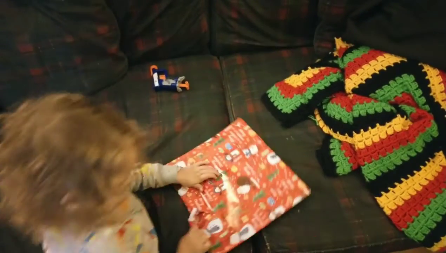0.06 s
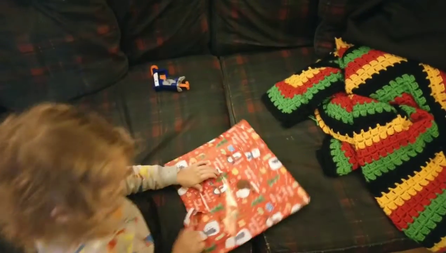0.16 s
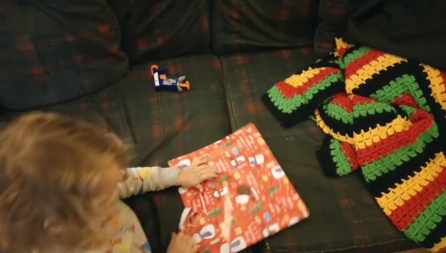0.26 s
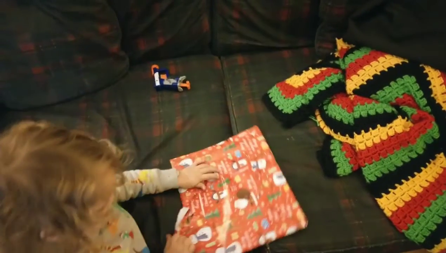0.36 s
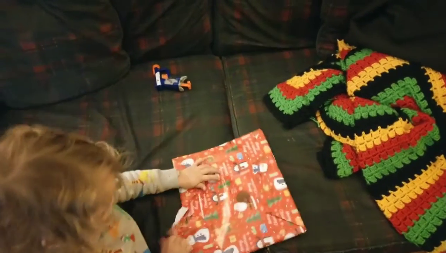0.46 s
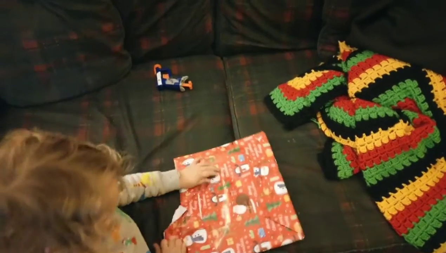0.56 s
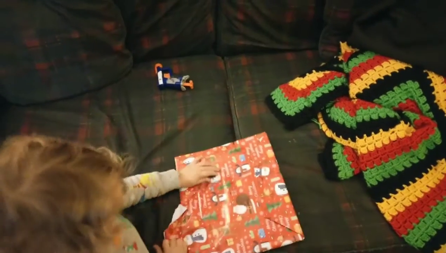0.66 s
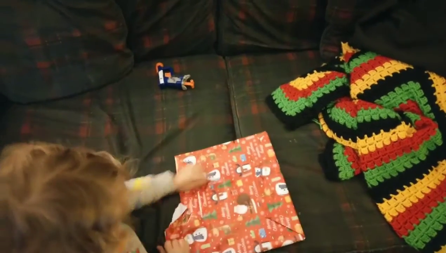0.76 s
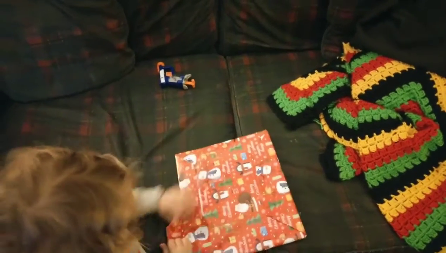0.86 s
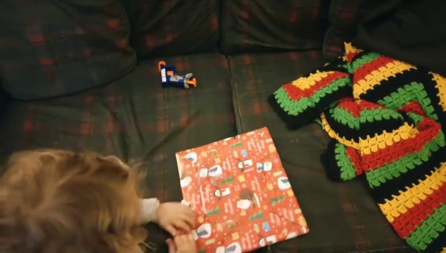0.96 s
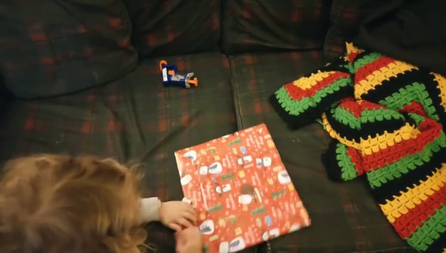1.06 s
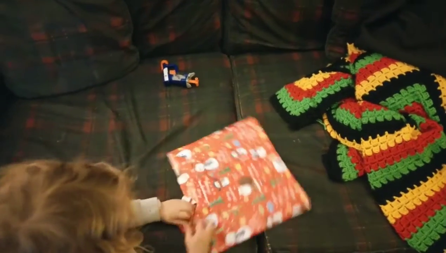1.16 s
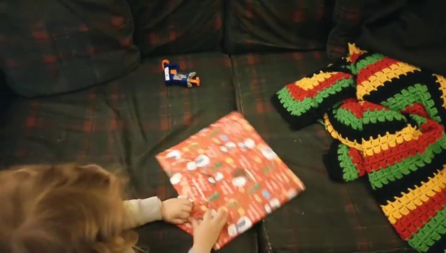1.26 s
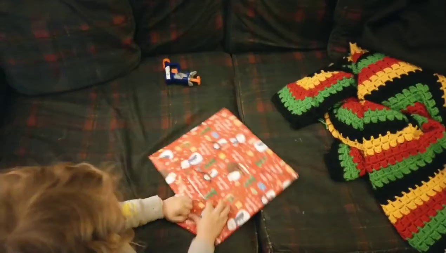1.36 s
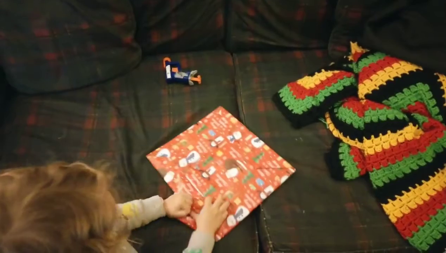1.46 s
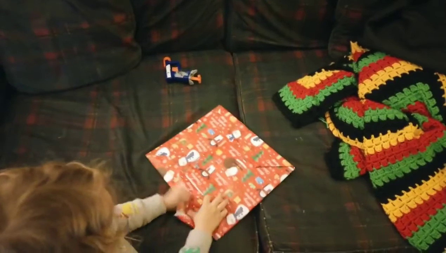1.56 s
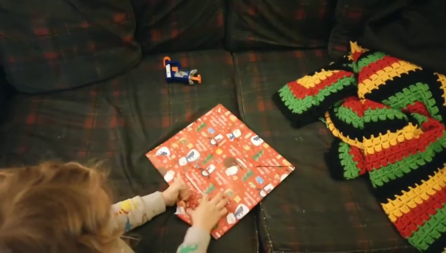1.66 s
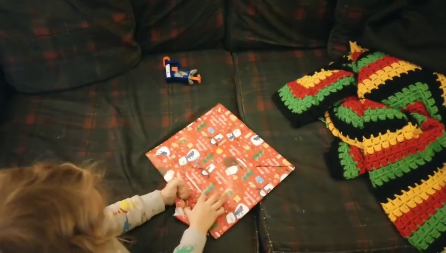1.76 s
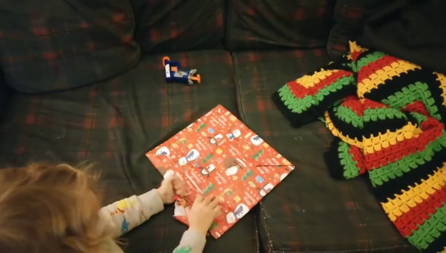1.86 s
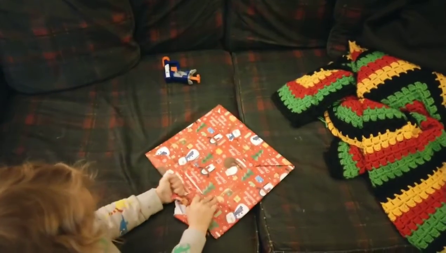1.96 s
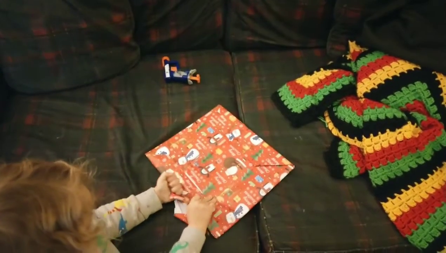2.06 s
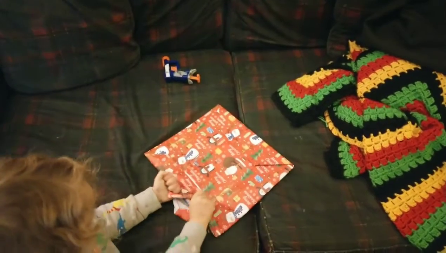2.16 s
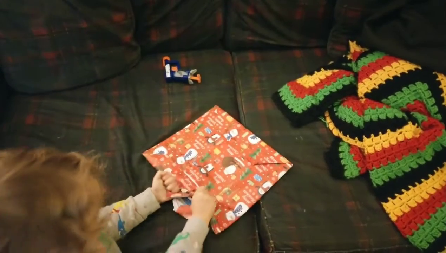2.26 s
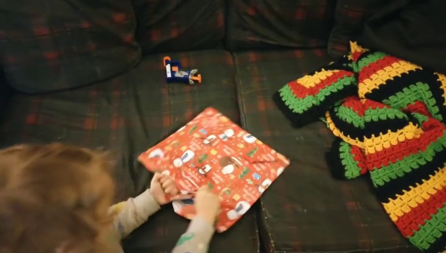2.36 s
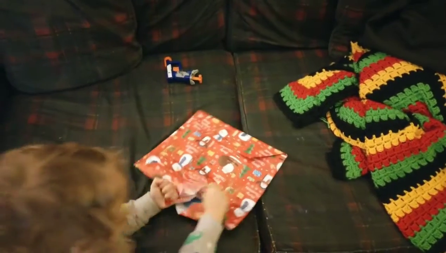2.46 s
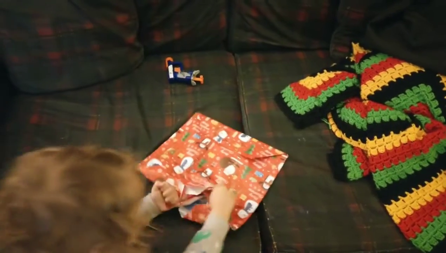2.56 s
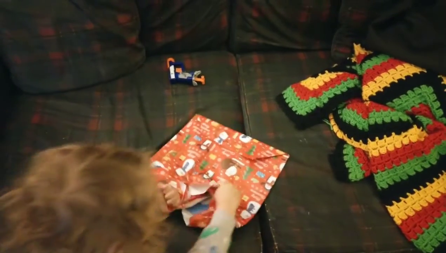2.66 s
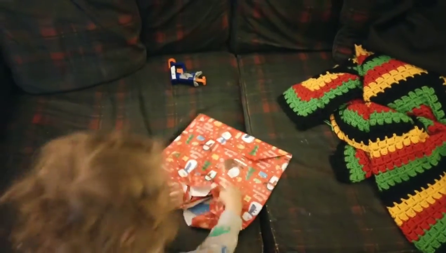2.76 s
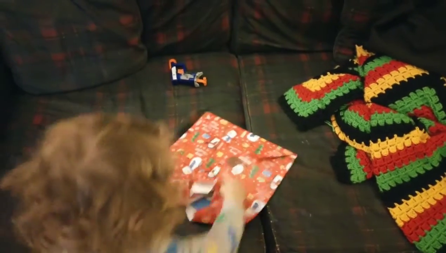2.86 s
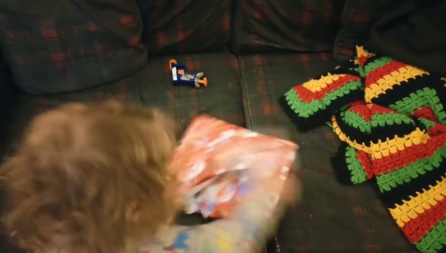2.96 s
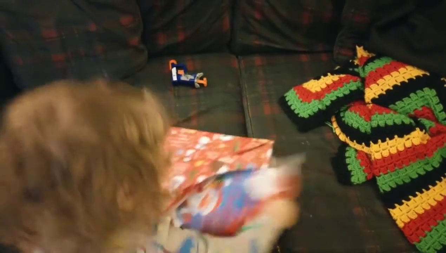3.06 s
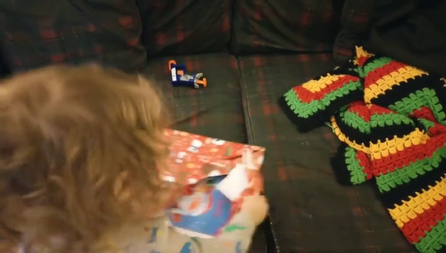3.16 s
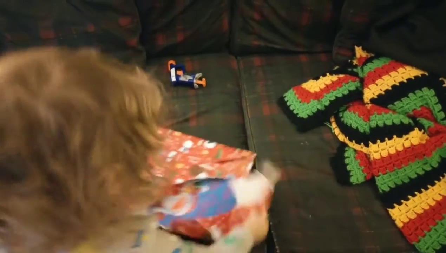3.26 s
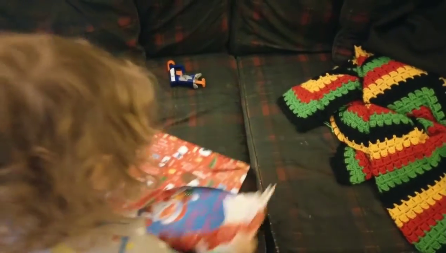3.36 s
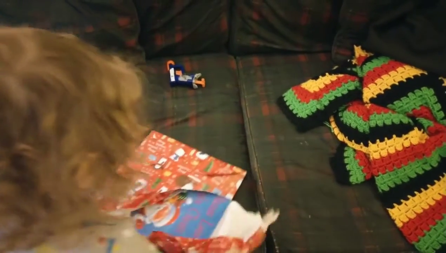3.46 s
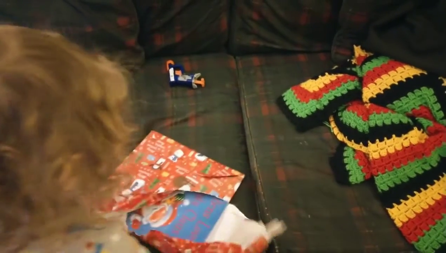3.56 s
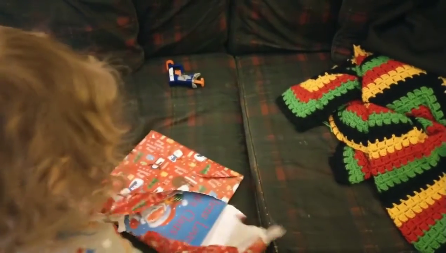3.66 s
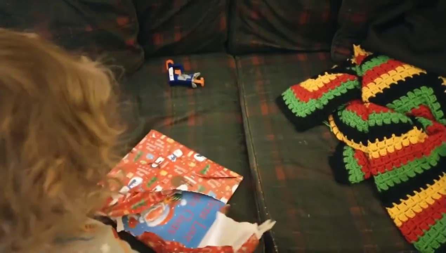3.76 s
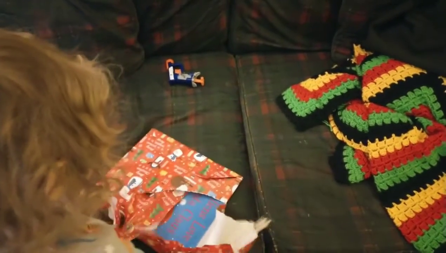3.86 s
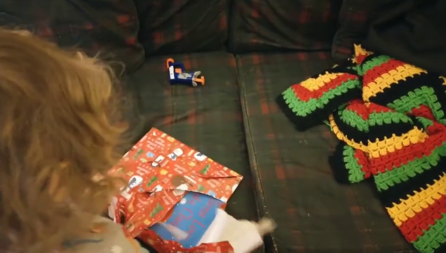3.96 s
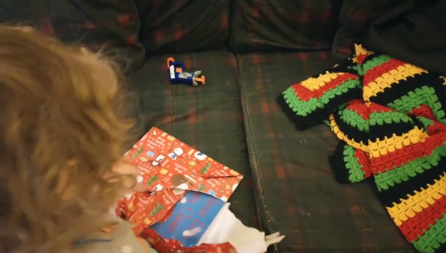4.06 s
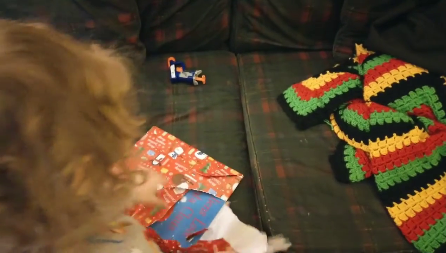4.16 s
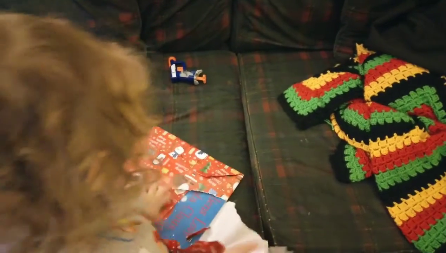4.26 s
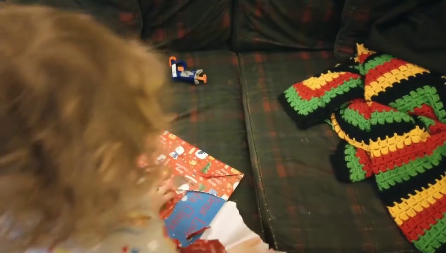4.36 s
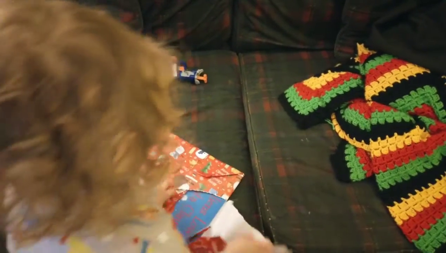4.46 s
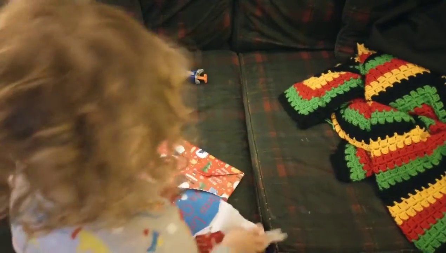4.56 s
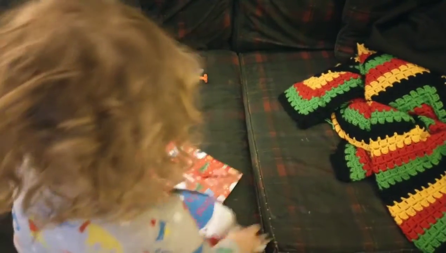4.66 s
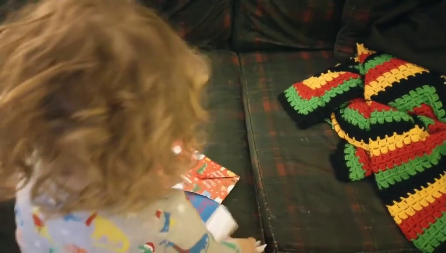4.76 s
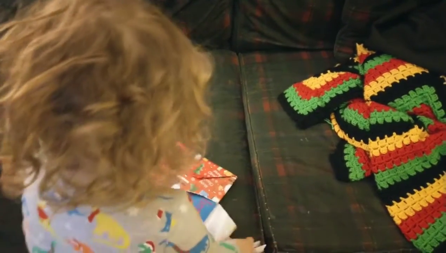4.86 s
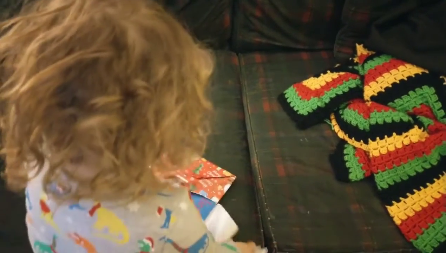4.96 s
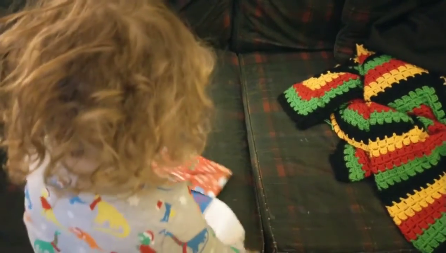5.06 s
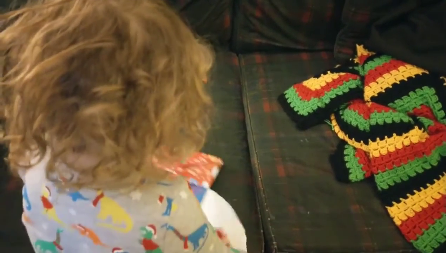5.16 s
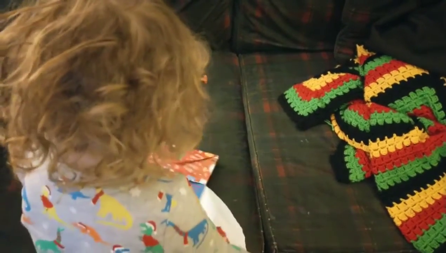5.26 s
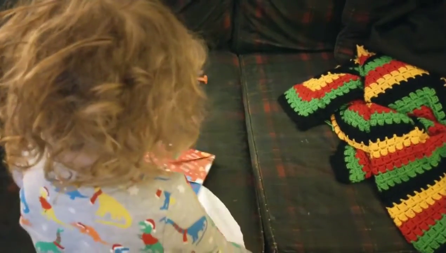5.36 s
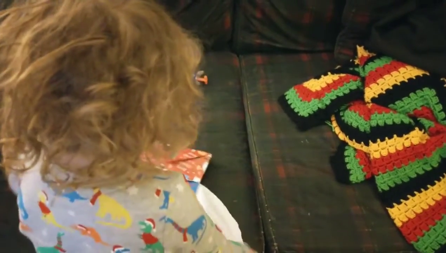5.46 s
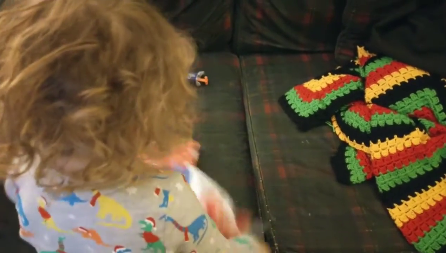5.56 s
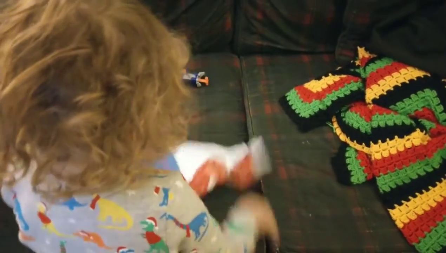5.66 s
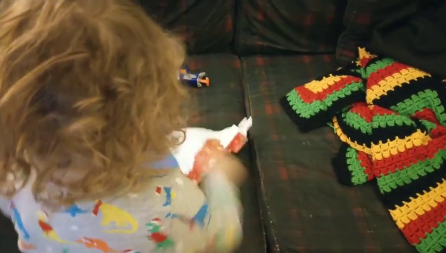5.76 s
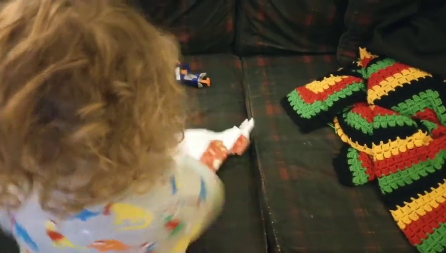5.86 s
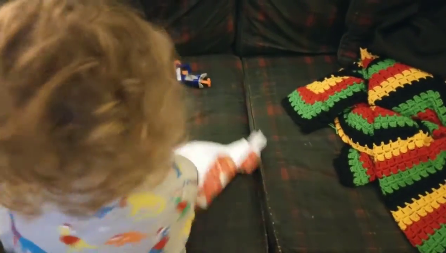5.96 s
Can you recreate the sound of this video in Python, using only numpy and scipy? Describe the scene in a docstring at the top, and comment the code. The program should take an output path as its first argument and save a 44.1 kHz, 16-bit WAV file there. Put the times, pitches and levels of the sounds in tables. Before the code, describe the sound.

Thin wrapping paper crackles close to the microphone from the start, as small hands pull it off a book on a sofa. Short, fizzy rips and single crisp snaps come irregularly through the first two and a half seconds. The book bumps softly around 0.7 and 1.6 seconds and scuffs dully against the cushion around 1 second. A sharp snap of paper at about 2.7 seconds leads into the loudest moment, a bright rip with a knock just after 3 seconds. From about 3.4 to 4.7 seconds the handling is quieter, with scattered light crinkles. Then the tugging and crackling pick up again, with small rips around 5.2 seconds and a soft bump near the end. The furnished room adds only a brief reverberation and a faint steady hum.

```python
"""Thin wrapping paper snaps and crackles close by, as small hands tear it from a book on a sofa.
Creases buckle in single snaps over a bed of fine crackle; fibres rip with a brighter fizz, loudest
just after 3 s. The book scuffs the cushion, and fingers and book corners bump. A furnished room
answers briefly and hums faintly; the hand that holds the stereo microphone jolts now and then."""
import sys
import numpy as np
from scipy import signal
from scipy.fft import rfft, irfft, next_fast_len
from scipy.io import wavfile
from scipy.ndimage import map_coordinates

SR = 44100
rng = np.random.default_rng(int(sys.argv[2]) if len(sys.argv) > 2 else 0)


def digitize_waveform(pressure):
    """Quantize a signal to 16-bit integers and store it at the path in sys.argv[1].

    Rows of a 2-D input are taken as channels; values are limited to [-1, 1].
    """
    field = np.atleast_2d(pressure).T
    bounded = np.clip(field, -1, 1)
    quanta = np.round(bounded * 32767).astype(np.int16)
    wavfile.write(sys.argv[1], SR, quanta)


N = 264600  # 6 s

# Spectrum of the room's air noise: f/Hz, level/dB
AIR_SPECTRUM = [(20, -6), (60, -16.5), (150, -14), (600, -15), (2300, -24.5), (5000, -24.5), (12000, -29.5)]
# Bands of appliance hum: f/Hz, width/Hz, level/dB
HUM_BANDS = [(265, 32, 15), (97.7, 49, 5)]
# Jolts of the hand on the microphone: t/s, level/dB
HAND_JOLTS = [(.6, -49), (3.17, -56), (3.36, -51)]
# Reverberation time of the room: f/Hz, T60/s
ROOM_T60 = [(200, 0.76), (2000, 0.25), (10000, 0.28)]
# Likeness of the reverberation at left and right: f/Hz, coherence (0-1)
ROOM_COHERENCE = [(300, 0.98), (3000, 0.4), (12000, 0)]
# First echoes off seat and backrest: delay/s, level/dB
SOFA_ECHOES = [(.0028, -13), (.0085, -13)]
# Bumps of fingers and book corners: t/s, level/dB, f/Hz
BUMPS = [(.519, -33.5, 730), (.69, -25, 537), (1.524, -35, 570), (1.626, -31.5, 653), (1.763, -39, 167),
         (3.146, -14, 890), (4.615, -43, 188), (5.559, -41, 160), (5.87, -32.5, 846)]
# The book rubbing the cushion: t/s, level/dB relative to the usual crumple
SCUFF_LEVELS = [(0, -6), (.4, -9.5), (.9, 3), (1.7, -10.5), (2.6, -11.5), (3.15, -5.5), (4.2, -8.5),
                (4.63, -7.5), (5.2, -6.5), (5.7, -3)]
# Colour of the scuff: f/Hz, gain/dB
SCUFF_COLOUR = [(40, -11), (120, -9.5), (350, -5), (800, 4.5), (1400, 0.5), (3000, -24)]
# Steady handling of the paper: t/s, crumple level/dB, rip over crumple/dB
STEADY_HANDLING = [(0, -49.5, 0), (.55, -48, 1.5), (.67, -59.5, 4), (1, -63, 7), (1.09, -65.5, -4),
                   (1.4, -54, 4.5), (1.9, -50.5, -0.5), (2.42, -44.5, -1), (2.51, -54.5, 4), (2.75, -43, 2),
                   (3.04, -49, -2), (3.27, -41.5, -1), (3.37, -51.5, -3), (3.75, -59.5, -2.5),
                   (4.11, -63.5, 0.5), (4.2, -74, 2), (4.45, -67.5, 2.5), (4.72, -48.5, -2.5),
                   (5.4, -49, 0.5), (5.84, -49, 0), (6, -60.5, 0)]
# Tugs at the sheet: t/s at full pull, build-up/s, hold/s, crumple level/dB, rip over crumple/dB
SHEET_TUGS = [(.2, 0.13, 0.027, -50.5, 8), (0.345, 0.007, 0.043, -39.5, 0.5), (0.433, 0.017, 0.018, -42, 7),
              (0.69, 0.0066, 0.049, -46, 3), (1.136, 0.0051, 0.012, -44, 1.5),
              (1.296, 0.026, 0.014, -46, 5.5), (1.625, 0.0045, 0.11, -48, -9),
              (1.756, 0.13, 0.045, -43.5, 1), (1.992, 0.01, 0.022, -34.5, -2),
              (2.173, 0.0071, 0.032, -42.5, 0.5), (2.286, .02, 0.09, -40.5, -1),
              (2.41, 0.017, 0.016, -40.5, 4), (2.539, 0.0089, 0.095, -37, -4),
              (2.656, 0.0034, 0.021, -30.5, 2.5), (2.933, 0.13, 0.017, -33.5, -2),
              (3.049, .005, 0.042, -41.5, -3), (3.151, 0.065, 0.014, -20, 2),
              (3.184, 0.058, 0.027, -25, 4.5), (4.011, 0.0035, 0.031, -44.5, -4.5),
              (4.472, 0.05, 0.023, -47, -4), (4.954, 0.011, 0.01, -41, 2), (5.078, 0.01, 0.0073, -45, 6),
              (5.171, 0.0062, 0.016, -37, 5.5), (5.232, 0.066, 0.023, -36.5, 1.5),
              (5.503, 0.02, 0.008, -38, 1.5), (5.607, .003, 0.0092, -46.5, -22),
              (5.726, 0.022, 0.0095, -42.5, -26)]
# The freed flap grows and crackles lower: t/s, centre f/Hz
FLAP_PITCH = [(2, 2560), (3, 1840)]
# Colour of the crumpling sheet: f/Hz, gain/dB
SHEET_COLOUR = [(250, -27), (800, -4.5), (1700, 0), (2600, 6), (3600, 1), (6500, 7)]
# Colour of the ripping fibres: f/Hz, gain/dB
FIBRE_COLOUR = [(1500, -29), (3300, -7.5), (4800, -5), (6500, -3), (8500, -3), (11500, -7.5),
                (13000, -16.5)]
# Creases that buckle: t/s, level/dB, f/Hz
CREASES = [(0.0347, -22.5, 2700), (.129, -27, 2870), (0.1992, -26.5, 2530), (.247, -28, 3470),
           (0.392, -22, 2400), (0.434, -18, 3630), (.443, -31, 3300), (0.471, -19, 4330),
           (0.5427, -24.5, 3470), (0.5662, -25, 4330), (0.589, -30.5, 1760), (.6328, -30.5, 1080),
           (0.6888, -23, 2780), (0.71, -23.5, 2880), (0.744, -30, 4500), (0.8117, -32, 2680),
           (0.8276, -32.5, 4430), (0.905, -28.5, 2980), (0.9326, -30, 2300), (0.9589, -23, 2530),
           (1.026, -33, 2960), (1.1362, -24, 2330), (1.1387, -21, 2180), (1.163, -24, 3180),
           (1.234, -37.5, 1510), (1.2592, -34, 2640), (1.298, -22.5, 3220), (1.311, -19.5, 2170),
           (1.4767, -34, 2860), (1.5245, -24, 2640), (1.629, -22, 2150), (1.6799, -24, 2210),
           (1.7576, -20, 2930), (1.784, -21.5, 2370), (1.8853, -17.5, 2760), (1.9695, -32, 3020),
           (1.995, -18, 2420), (2.078, -27.5, 2620), (2.0983, -19.5, 2650), (2.145, -31.5, 3520),
           (2.1725, -24.5, 7200), (2.2864, -25.5, 2030), (2.337, -24, 2290), (2.36, -33, 3420),
           (2.4118, -22, 3330), (2.6574, -9.5, 1740), (2.672, -11, 1860), (2.7305, -23.5, 2450),
           (2.772, -26, 2700), (2.82, -24.5, 3120), (2.868, -28, 2100), (2.914, -27, 3170),
           (2.936, -20.5, 3300), (2.973, -27, 2060), (3.0093, -21, 2310), (3.048, -23.5, 2320),
           (3.09, -17, 1920), (3.1397, -11, 2400), (3.1511, -5.5, 2270), (3.2202, -10.5, 2630),
           (3.335, -29, 2040), (3.409, -35, 2720), (3.514, -32, 2300), (3.597, -38, 1740),
           (3.725, -44, 3600), (3.7646, -23, 2870), (3.8236, -36.5, 3720), (3.8867, -34.5, 4770),
           (3.9582, -28, 3850), (4.0056, -31.5, 2300), (4.142, -31.5, 2760), (4.2594, -37, 2150),
           (4.284, -35.5, 1620), (4.4736, -27.5, 2500), (4.5048, -30.5, 2220), (4.5447, -34, 2800),
           (4.7716, -21, 7950), (4.8166, -26.5, 6960), (4.834, -35, 1790), (4.9546, -28.5, 1330),
           (4.996, -27, 2640), (5.147, -33, 2320), (5.1735, -25.5, 4420), (5.237, -22, 2050),
           (5.2848, -20, 7100), (5.334, -33, 2940), (5.382, -31, 2050), (5.393, -27, 2150),
           (5.5062, -20.5, 1580), (5.6062, -27.5, 1470), (5.661, -51, 2150), (5.726, -26, 2750),
           (5.739, -28.5, 1750), (5.885, -34, 3120)]
# Imbalance of the two microphone ports: f/Hz, left over right/dB
PORT_BALANCE = [(2500, 0.5), (7000, 2), (13000, 2)]
# Response common to both ports: f/Hz, gain/dB
MIC_RESPONSE = [(8300, 1), (9300, -2.5), (12800, 1), (13400, -20), (14400, -36)]


def amp(db):
    """Amplitude ratio of a level in decibels."""
    return 10 ** (np.asarray(db) / 20)


def unit(x):
    """Normalisation to an rms of 1."""
    return x / np.sqrt(np.mean(x ** 2) + 1e-20)


def along(points, hz):
    """Interpolation of (f/Hz, value) points on a logarithmic frequency axis."""
    f, values = np.transpose(points)
    return np.interp(np.log(hz + 1), np.log(f + 1), values)


def curves(rows):
    """Linear interpolation in time: one value a sample for each column after t/s."""
    times, *columns = np.transpose(rows)
    return [np.interp(np.arange(N) / SR, times, column) for column in columns]


def wobble(rate):
    """Smooth random modulation: a spline through `rate` Gaussian knots a second."""
    return map_coordinates(rng.standard_normal(int(N * rate / SR) + 4), [np.arange(N) * rate / SR])


def swell(at_s, held_s, db, rise, fall):
    """Exponential growth to db at at_s, a hold, then exponential decay; slopes in dB/s."""
    t = np.arange(N) / SR - at_s
    return amp(db - rise * np.maximum(-t, 0) - fall * np.maximum(t - held_s, 0))


def filtered(x, response):
    """Linear filtering: the spectrum of x times response(f/Hz)."""
    size = next_fast_len(N + SR // 2)
    return irfft(rfft(x, size) * response(np.fft.rfftfreq(size, 1 / SR)), size)[..., :N]


def cohere(a, b, coherence):
    """Partial coherence: weighted sum and difference of two independent noises give left and right."""
    angle = np.arccos(np.clip(coherence, 0, 1)) / 2
    mid, side = np.cos(angle) * a, np.sin(angle) * b
    return np.array([mid + side, mid - side])


def stereo_noise(coherence):
    """White noise in two partly correlated channels."""
    return cohere(*rng.standard_normal((2, N)), coherence)


def grains(at_s, gain, hz, cycles, lag_s=0, pan_db=0, *, size):
    """Damped oscillators, `size` samples long; time and level differences place each in stereo."""
    out = np.zeros((2, N + size))
    for channel, side in enumerate((.5, -.5)):
        start = np.clip((at_s + side * lag_s) * SR, 0, N - 1)
        samples = np.ceil(start).astype(int)[:, None] + np.arange(size)
        turns = (samples - start[:, None]) / SR * hz[:, None]
        envelope = np.exp(-turns / cycles) * (1 - np.exp(-turns / 0.1))
        wave = np.sin(2 * np.pi * turns) * envelope * (gain * amp(side * pan_db))[:, None]
        out[channel] = np.bincount(samples.ravel(), wave.ravel(), N + size + 1)[:N + size]
    return out[:, :N]


def crackle(colour, hz, clumps_db, octaves, cycles, spread_db, lag_s, pan_db, count, size):
    """Shot noise at rms 1: random grains with long-tailed strengths and log-normal pitch about hz."""
    when, strength = rng.random((count, 2)).T
    detune, lag, pan = rng.standard_normal((count, 3)).T
    gain = amp(np.minimum(-spread_db * np.log(1 - strength), 15.5))
    centre_hz = np.broadcast_to(hz, N)[(when * N).astype(int)]
    pitch_hz = np.clip(centre_hz * 2 ** (octaves * detune), 80, SR / 3)
    bed = grains(when * N / SR, gain, pitch_hz, cycles, lag_s * lag, pan_db * pan, size=size)
    return unit(filtered(bed * amp(clumps_db), lambda f: amp(along(colour, f))))


def room_tone():
    """Ambient noise: steady broadband air, and an appliance's wavering hum as two narrow noise bands."""
    def hum_response(f):
        return sum(amp(db) / (1 + (2 * (f - hz) / width) ** 2) for hz, width, db in HUM_BANDS)
    air = unit(filtered(stereo_noise(0.76), lambda f: amp(along(AIR_SPECTRUM, f))))
    hum = unit(filtered(stereo_noise(0.91), hum_response))
    return amp(-62.5) * air + amp(-74 + 4.2 * wobble(2.98)) * hum


def microphone_jolts():
    """Structure-borne sound: the holding hand shakes both ports alike, in a flutter near 14 Hz."""
    flutter = unit(filtered(stereo_noise(1), lambda f: 1 / (1 + ((f - 14) / 6) ** 2)))
    return flutter * sum(swell(at_s, 0, db, rise=89, fall=89) for at_s, db in HAND_JOLTS)


def reverberation(x, count=3):
    """Diffuse field: each frequency decays at its own rate."""
    # three tails cross-fade at random, so the reverberation has no steady ringing tone
    phase = np.cumsum(np.abs(wobble(5.04))) * 12 / SR
    wet = 0
    for k in range(count):
        hz, t, (a, b) = signal.stft(rng.standard_normal((2, SR // 3)), SR, nperseg=128)
        field = cohere(a, b, along(ROOM_COHERENCE, hz)[:, None])
        decay = amp(-60 * t / along(ROOM_T60, hz)[:, None])
        tail = signal.istft(field * decay, SR, nperseg=128)[1]
        share = np.pad(x * np.cos(phase + k * np.pi / count), ((0, 0), (110, 0)))  # 2.5 ms late
        wet = wet + signal.fftconvolve(share, tail / np.linalg.norm(tail[0]), axes=1)[:, :N]
    return wet


def sofa_reflections(x):
    """Comb filtering: the direct sound interferes with its echoes off seat and backrest."""
    return filtered(x, lambda f: 1 + sum(amp(db) * np.exp(-2j * np.pi * f * s) for s, db in SOFA_ECHOES))


def bumps():
    """Heavily damped impacts: each rings for a cycle or two over a thud from the book's weight."""
    at_s, db, hz = np.transpose(BUMPS)
    knock = grains(at_s, amp(db), hz, cycles=1.36, size=1024)
    thud = grains(at_s, amp(db - 26.5), hz=np.full_like(hz, 96), cycles=0.93, size=2048)
    return thud + filtered(knock, lambda f: (1j * f / (130 + 1j * f) * 1100 / (1100 + 1j * f)) ** 2)


def cushion_scuff(crumple_db, jerks):
    """Friction: the book rubs the cushion in dull grains, partly following the crumple's level."""
    usual_db, follows = -56.5, 0.68
    rub = crackle(SCUFF_COLOUR, hz=596, clumps_db=2 * jerks + wobble(25), octaves=0.82, cycles=0.88,
                  spread_db=3.36, lag_s=7e-5, pan_db=1.8, count=3000, size=256)
    driven_db = usual_db + follows * (crumple_db - usual_db)
    return amp(driven_db + curves(SCUFF_LEVELS)[0] - 2.5) * rub


def hand_levels():
    """Incoherent powers add: handling plus tugs give crumple level/dB and rip over crumple/dB."""
    crumple_db, rip_db = curves(STEADY_HANDLING)
    crumple_power, rip_power = amp(crumple_db) ** 2, amp(crumple_db + rip_db) ** 2
    for at_s, build_s, held_s, db, tug_rip_db in SHEET_TUGS:
        tug_power = swell(at_s, held_s, db, rise=17.5 / build_s, fall=395) ** 2
        crumple_power += tug_power
        rip_power += tug_power * amp(tug_rip_db) ** 2
    return 10 * np.log10(crumple_power), 10 * np.log10(rip_power / crumple_power)


def run_on():
    """Relaxation envelope: after each snap the buckling runs on along the fold and dies away."""
    kicks, t = np.zeros(N), np.arange(SR // 8) / SR
    for at_s, db, _ in CREASES:
        kicks[round(at_s * SR)] = amp(db - 24)
    attack_s, t60_s = 0.0002, 0.055
    decay = amp(-60 * t / t60_s) * (1 - np.exp(-t / attack_s))
    return np.abs(signal.fftconvolve(kicks, decay)[:N])


def sheet_crackle(jerks):
    """Small-scale buckling: the bending sheet emits dense clicks, each fold in its own colour."""
    fold_hz = curves(FLAP_PITCH)[0] * 2 ** (0.25 * wobble(14))
    return crackle(SHEET_COLOUR, fold_hz, clumps_db=3 * jerks + wobble(90), octaves=0.41, cycles=1.53,
                   spread_db=3.57, lag_s=5e-5, pan_db=0.77, count=14000, size=96)


def fibre_rip(jerks, slack):
    """Fracture: fibres part in bright ticks, so densely in a hard rip that they merge into a hiss."""
    tick_hz = 6400 * 2 ** (0.31 * wobble(12))
    clumps_db = 3 * jerks + 1.36 * slack * wobble(60)
    ticks = crackle(FIBRE_COLOUR, tick_hz, clumps_db, octaves=0.8, cycles=1.5,
                    spread_db=3.9, lag_s=1.8e-5, pan_db=11.8, count=16000, size=32)
    rough_noise = stereo_noise(0.3) * amp(2.8 * wobble(220))
    hiss = unit(filtered(rough_noise, lambda f: amp(along(FIBRE_COLOUR, f))))
    return np.sqrt(slack) * ticks + np.sqrt(1 - slack) * hiss


def rustle(crumple_db, rip_db):
    """Common modulation: one uneven pull drives sheet, fibres and cushion; a hard rip runs steadier."""
    slack = np.clip((-27.5 - crumple_db) / 30, .15, 1)
    jerks = wobble(50) * slack
    paper = sheet_crackle(jerks) + amp(rip_db) * fibre_rip(jerks, slack)
    envelope = amp(crumple_db - 2.5) + run_on()
    return envelope * paper + cushion_scuff(crumple_db, jerks)


def crease_snaps(rip_db):
    """Snap-through buckling: a crease gives way and the panel rings; thin paper radiates no bass."""
    at_s, db, hz = np.transpose(CREASES)
    lag, pan, edge_detune, overtone_detune, tautness = rng.standard_normal((len(at_s), 5)).T
    place = dict(lag_s=2.5e-5 * lag, pan_db=2 * pan)
    bright_db = rip_db[(at_s * SR).astype(int)] + 2 * tautness  # a taut, ripping sheet snaps brighter
    overtone_hz = hz * 1.39 * 2 ** (0.33 * overtone_detune)
    edge_hz = 7200 * 2 ** (0.22 * edge_detune)
    edge_db = np.minimum(db, -20) + bright_db - 5  # big folds gain body, not edge
    ring = grains(at_s, amp(db + 1.5), hz, cycles=1.9, size=128, **place)
    overtone = grains(at_s, amp(db - 4.5), overtone_hz, cycles=2, size=64, **place)
    edge = grains(at_s + 0.000362, amp(edge_db), edge_hz, cycles=3, size=48, **place)
    click = grains(at_s, amp(db + bright_db - 6), np.full_like(hz, 11000), cycles=.8, size=16, **place)
    return filtered(ring + overtone + edge + click, lambda f: (1j * f / (900 + 1j * f)) ** 3)


def scene():
    """Superposition: paper and book, their echoes and reverberation, and the background noise."""
    crumple_db, rip_db = hand_levels()
    direct = rustle(crumple_db, rip_db) + crease_snaps(rip_db) + bumps()
    near = sofa_reflections(direct)
    return near + amp(-13.5) * reverberation(near) + room_tone() + microphone_jolts()


def record(dry):
    """Peaks are softly limited below full scale; each microphone port has its own colour, and the band is
    limited."""
    ceiling, top_hz = .9, 14416

    def response(hz):
        imbalance_db = np.outer([.5, -.5], along(PORT_BALANCE, hz))
        return amp(along(MIC_RESPONSE, hz) + imbalance_db) * (hz < top_hz)
    return filtered(ceiling * np.tanh(dry / ceiling), response)


dry = scene()
out = record(dry)
digitize_waveform(out)
```